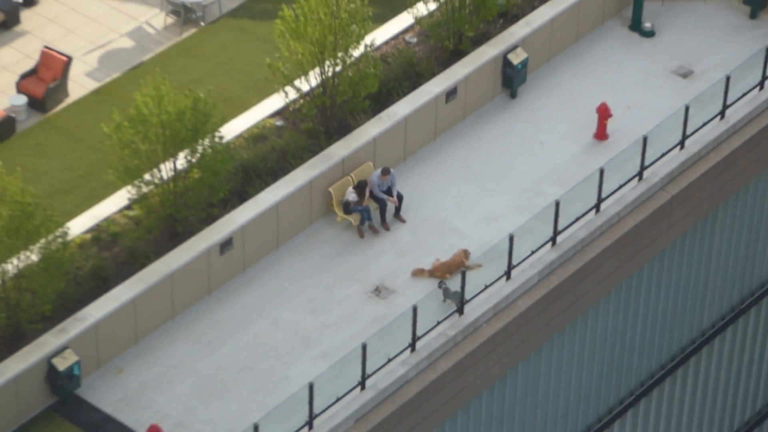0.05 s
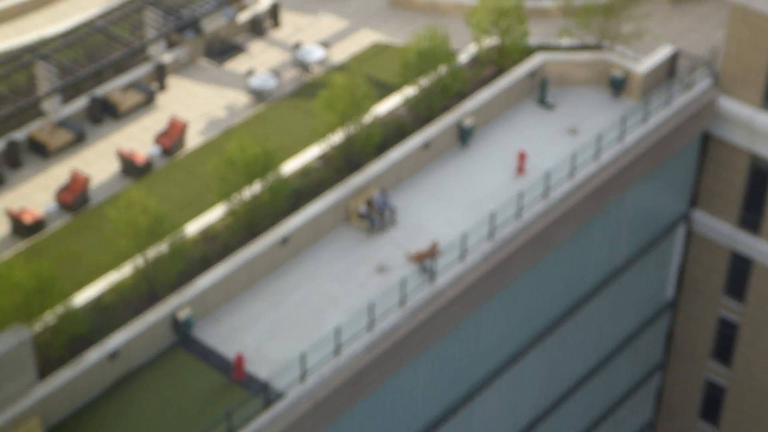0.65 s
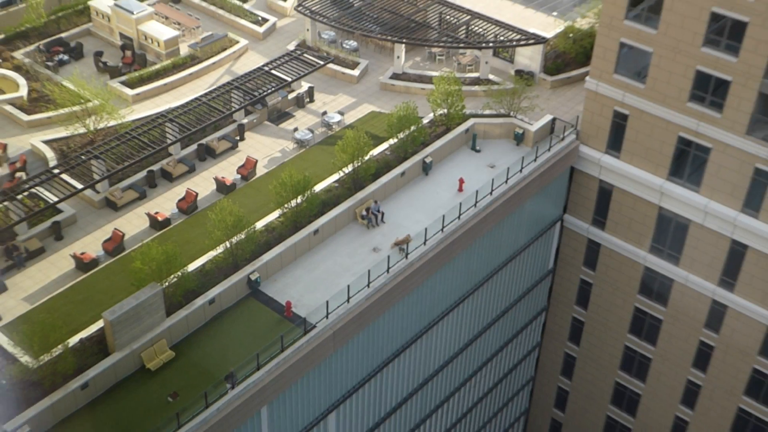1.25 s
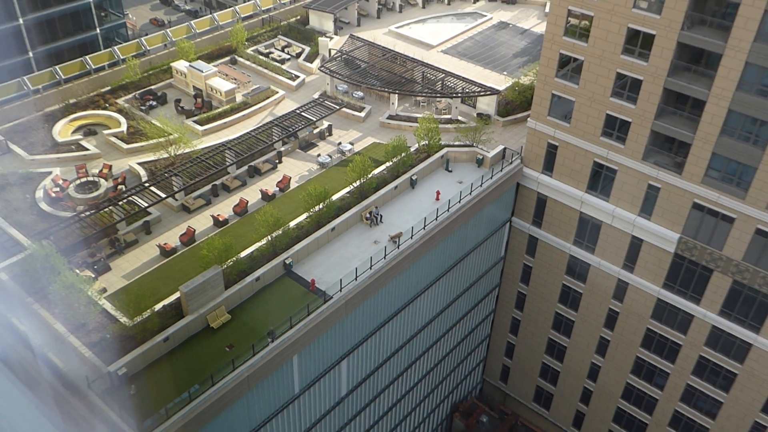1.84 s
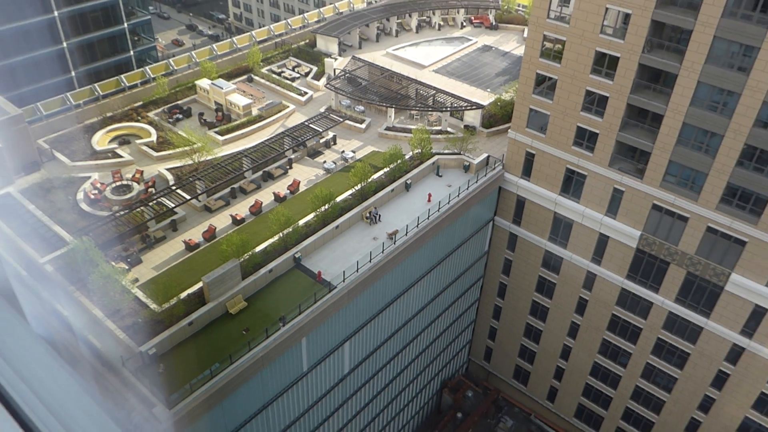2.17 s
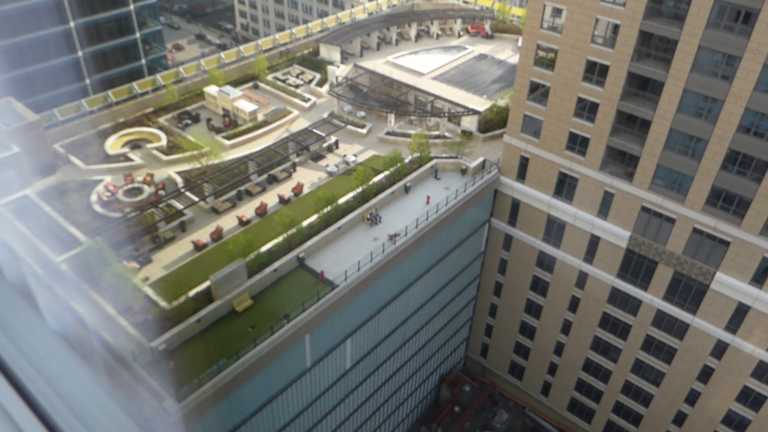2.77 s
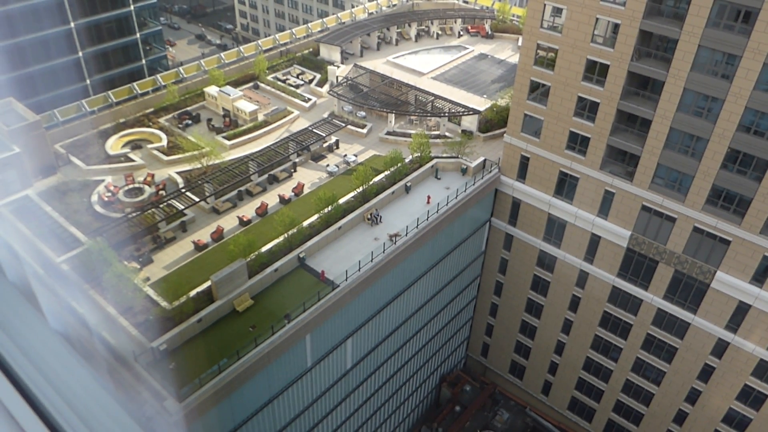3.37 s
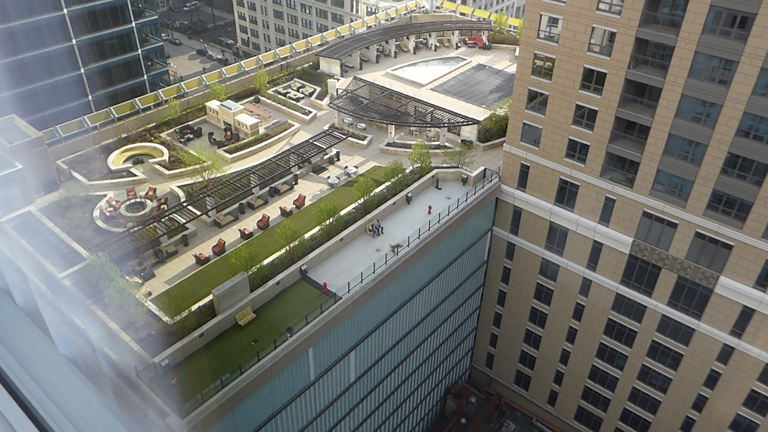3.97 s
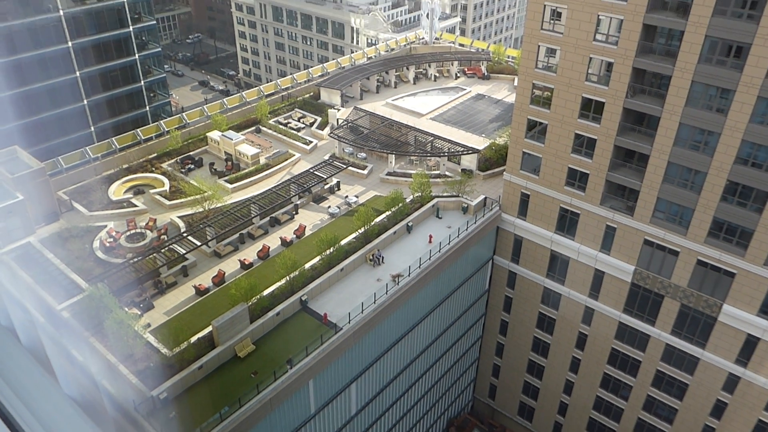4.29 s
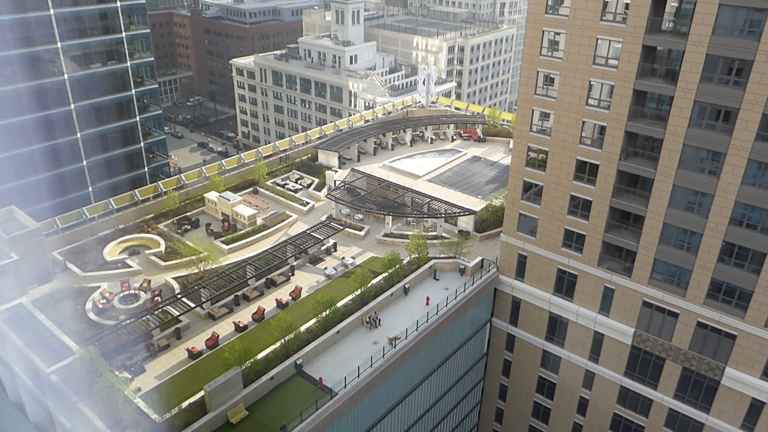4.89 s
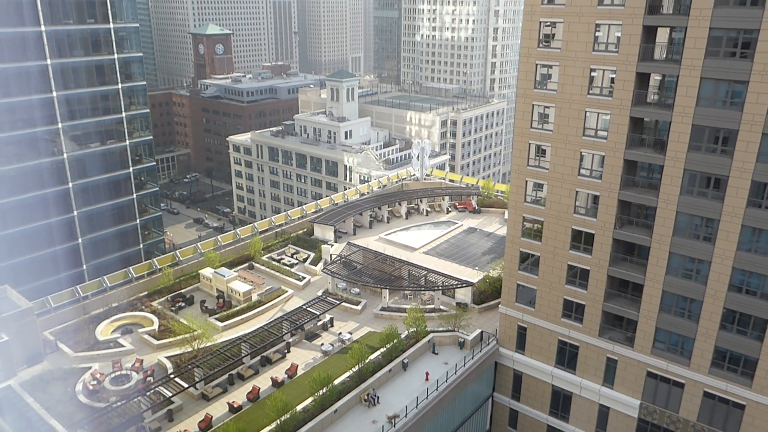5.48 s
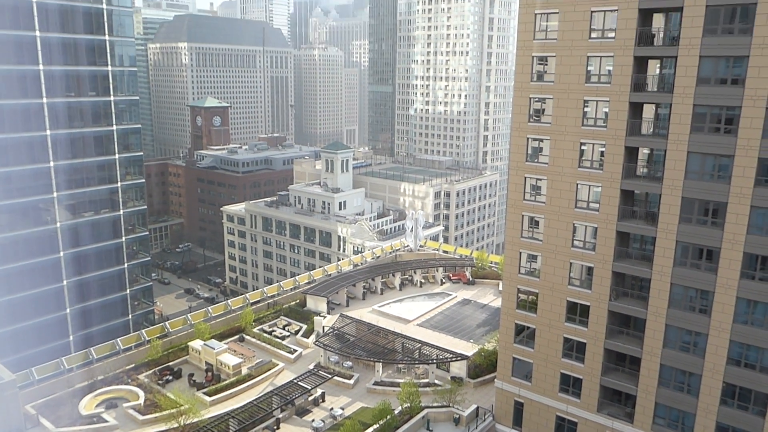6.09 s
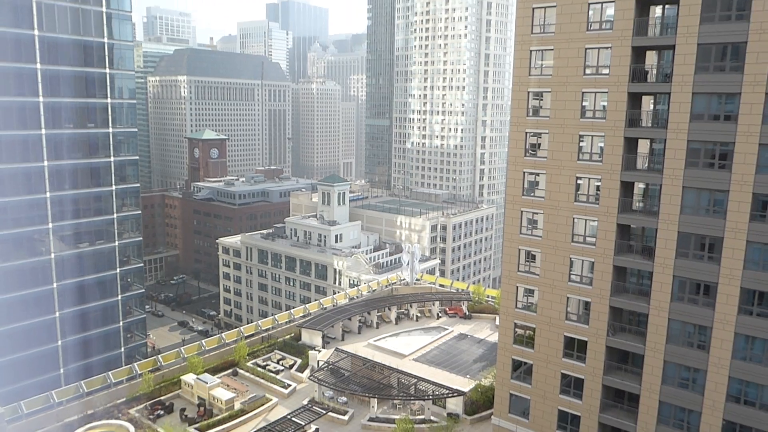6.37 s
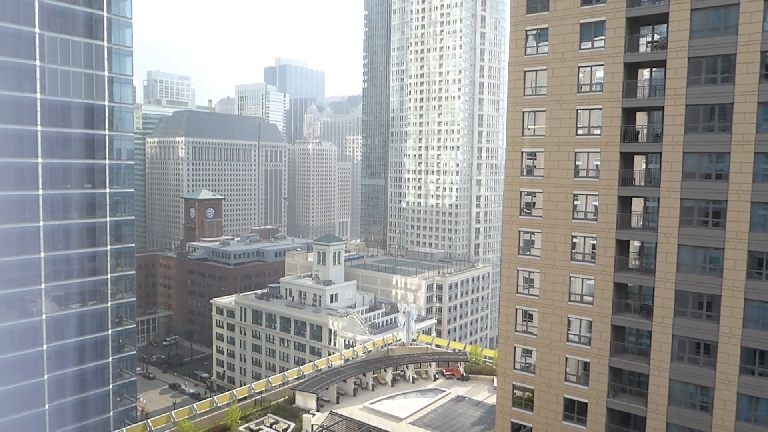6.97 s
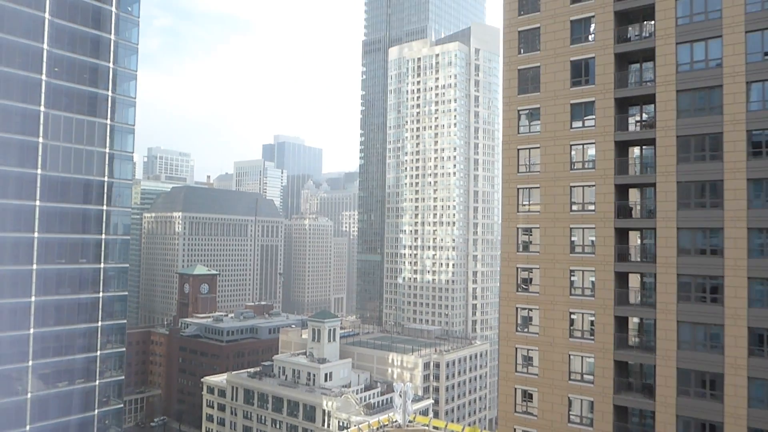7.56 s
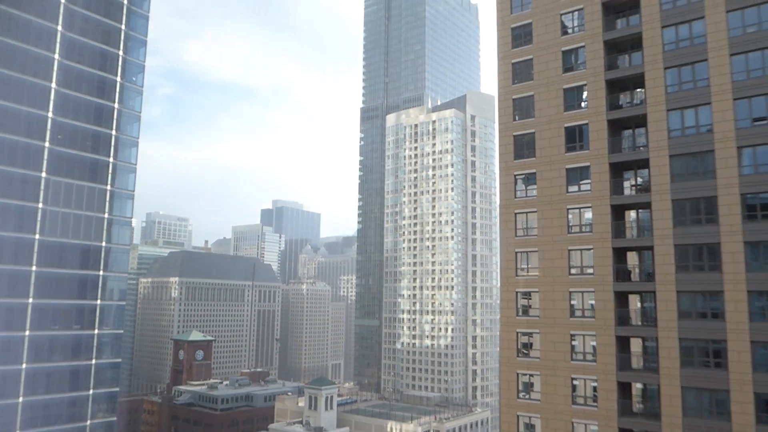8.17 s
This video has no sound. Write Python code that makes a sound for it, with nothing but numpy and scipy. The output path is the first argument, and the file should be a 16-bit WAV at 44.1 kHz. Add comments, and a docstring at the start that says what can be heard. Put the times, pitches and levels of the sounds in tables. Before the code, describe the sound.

Indoor ventilation drones while a camera lens softly whirs and ticks, stops, and the casing snaps once, sharp and close.

```python
"""Camera zoom in a high room

Ventilation hums and throbs under a thin hiss; the city is a dull wash behind the window glass.
Close up, a hand-held camera whirs as its lens zooms out: gears rub and ring the barrel, and the
mechanism ticks. The drive stops, then the casing strains and snaps home with one sharp click,
which makes the camera's gain control duck the room for a moment."""
import sys
import numpy as np
from scipy import signal
from scipy.fft import rfft, irfft, next_fast_len
from scipy.io import wavfile
from scipy.ndimage import uniform_filter1d, map_coordinates

SR = 44100
rng = np.random.default_rng(int(sys.argv[2]) if len(sys.argv) > 2 else 0)


def master_out(mix):
    """Clip the mix to full scale and print it as 16-bit PCM to the path in sys.argv[1]."""
    frames = np.transpose(np.atleast_2d(mix))
    ceiling = np.clip(frames, -1, 1)
    pcm = np.round(ceiling * 32767).astype(np.int16)
    wavfile.write(sys.argv[1], SR, pcm)


N = 363109

# stereo width of diffuse sound: (frequency [Hz], side minus mid [dB])
STEREO_WIDTH = [(25, -5.5), (60, -18.5), (100, -29), (190, -46), (260, -39), (310, -27), (400, -23),
                (500, -14.5), (700, -9.5), (900, -1.5), (1400, 0), (2500, -1.5), (6000, -4), (15000, -4)]
# motor hum and the fan tones that beat against it: (frequency [Hz], level [dB], phase wander [rad])
HUM_TONES = [(239.75, -38.5, 0.089), (248, -46.5, 0.45), (251.6, -53.5, 0.3), (257.4, -51, 0.45),
             (481, -66, 0.3), (703, -69.5, 0.67)]
# slow swelling of the hum: (time [s], gain [dB])
HUM_RIDE = [(0, 0), (1, .5), (2.6, 0), (3.2, 1.5), (4.7, 1), (5.9, -1.5), (7.2, 0), (8.2, -0.4)]
# air rumbling in the ducts: (frequency [Hz], relative level [dB])
DUCT_SPECTRUM = [(20, -24), (50, -41), (70, -27), (98, -13), (120, -13.5), (138, -17), (156, -4.5),
                 (170, -7), (186, -0.5), (208, -3.5), (232, -4), (248, -3.5), (268, -3.5), (280, -8),
                 (302, -12), (322, -8.5), (352, -16), (385, -6), (412, -8), (436, -16.5), (455, -14),
                 (472, -23), (700, -28.5), (1300, -69)]
# traffic through the glass: (frequency [Hz], relative level [dB])
TRAFFIC_SPECTRUM = [(250, -19), (450, -4.5), (570, 1), (720, -2.5), (900, -7.5), (1230, -9), (1400, -19),
                    (2300, -18.5), (2800, -56.5), (6000, -43)]
# waves of traffic passing far below: (time [s], half length [s], level [dB])
TRAFFIC_WAVES = [(1.453, 0.74, -58), (3.251, .35, -57), (4.745, 1, -54)]
# faint drones in the street: (time [s], half length [s], pitch [Hz], level [dB])
STREET_DRONES = [(3.2, 0.29, 571.7, -52), (4.5, 0.66, 579, -59), (4.5, 0.92, 707.4, -55.5),
                 (5.6, 0.56, 709, -55)]
# faint distant squeaks: (time [s], half length [s], pitch [Hz], level [dB])
FAR_SQUEAKS = [(2.91, .05, 2140, -63), (4.86, .06, 5300, -68), (5.1, 0.09, 4530, -67)]
# fine even hiss: (frequency [Hz], relative level [dB])
HISS_SPECTRUM = [(300, -21), (1500, 6.5), (2300, 3.5), (3000, 3.5), (4400, 1), (4750, 0.5), (5300, 0.5),
                 (5720, -8), (6200, 0), (8200, -4), (10000, 1), (11300, -4.5), (12800, -13), (15300, -23.5)]
# resonances of the lens barrel:
# (frequency [Hz], width [Hz], gain extended [dB], gain retracted [dB], side minus mid [dB])
BARREL_MODES = [(1774, 70, 4, 8, -2), (2360, 340, 0, 2.5, -3), (2610, 160, 6, -6, -9),
                (3004, 110, 0, 7, -6), (3210, 130, 10, 1, -10), (3320, 110, -6, 0, -10),
                (3970, 240, 2.5, 2.5, 3.5), (4270, 100, -4, -15, -7), (4500, 57, -4, -13, -5),
                (5350, 150, -11, 1, -2), (5730, 120, -16, -1, -5), (6100, 140, 0, 2, -15),
                (7300, 810, -19, -17, -5), (8750, 470, -10, -8, -6.5)]
# two bright rings of each motor step, sinking as the barrel draws in:
# (pitch extended [Hz], pitch retracted [Hz], width [Hz], gain [dB], rasp against tick [dB])
STEP_RINGS = [(10250, 9800, 1100, 0, 6), (11780, 11500, 860, 0, -2)]
# modes of the lens mount: (frequency [Hz], gain [dB], decay [share of the click's t60])
MOUNT_MODES = [(2260, -6, 0.42), (3330, 1, 0.65), (5720, 0.5, 0.64), (6550, -2.5, 0.65), (7230, -6, 0.5)]
# ping of the lens mount: (frequency [Hz], gain [dB], decay [share of the click's t60])
MOUNT_PING_MODES = [(4080, -1.5, 1.6)]
# low modes of the hollow casing: (frequency [Hz], gain [dB], decay [share of the click's t60])
SHELL_MODES = [(699, -27, 1.6), (975, -23, 2.2), (1940, -5, 0.8), (2825, 3.5, 0.55), (2910, -33, 13),
               (3108, -4, 0.896), (3420, 3, 0.69)]
# modes of the casing's stiff frame: (frequency [Hz], gain [dB], decay [share of the click's t60])
FRAME_MODES = [(3926, 2, 1), (5030, -1, 0.8), (6670, -5.5, 0.58), (7250, -2, 0.58)]
# modes of small stiff catches: (frequency [x their pitch], gain [dB], decay [share of the click's t60])
CATCH_MODES = [(.68, -14.5, 0.56), (.945, -3, 0.5), (1.0, -3.5, 0.58), (1.035, -2, 0.5), (1.19, -17, .4),
               (1.36, -23, 0.33)]
# noisy crack of a plastic contact: (frequency [Hz], relative level [dB])
CRACK_SPECTRUM = [(90, -44), (220, -11.5), (900, -9.5), (1700, -1), (3200, -1.5), (7000, -5), (11000, -6.5),
                  (13000, -14), (15000, -19.5), (16000, -35.5)]
# ticks of the lens mechanism, each with its own mix: # (time [s], gain [dB], mount [dB], mount ping [dB], crack
# [dB], catch [dB], catch pitch [Hz])
LENS_TICKS = [(0.55, -48, -9, -8, -1, 9, 9000), (1.1621, -26.5, -3, 1, -2.5, 14.5, 9880),
              (1.412, -45, -14, -8, -3, 16, 9800), (1.819, -17, 4, -15, -4.5, 7.5, 11040),
              (1.8367, -45, -6, -8, 0, 14, 10200), (1.996, -42, -5, -6, 0, 4, 9400),
              (2.084, -42.5, -2, -6, -1, -8, 10100), (2.788, -46, -2, -6, -5, -10, 10000)]
# contacts of the casing as it strains and snaps home: (time [s], gain [dB], shell [dB], frame [dB],
# crack [dB], catch [dB], rise [s], t60 [s], left minus right [dB])
CASING_SNAPS = [(3.558, -24.5, -13, -1, -3.5, 5, .0005, 0.011, 5.5),
                (3.5861, -14, 1.5, 0.5, -8, -3, 0.00086, 0.012, 2.5),
                (3.5901, -15, -1, -4.5, -4, -1, 0.000908, .023, -2),
                (3.601, -8, -4.5, 1.5, -4.5, -4.5, .0001, 0.012, -6.5),
                (3.6042, -3.5, -9.5, 1.5, -5.5, 5.5, .0001, 0.0091, -1.5),
                (3.6045, 1, 5, 2, -4, 3.5, 0.00011, .012, 1)]


def amp(db):
    """Decibels to gain."""
    return 10 ** (np.asarray(db) / 20)


def unit(x):
    """Scale to rms 1."""
    return x / np.sqrt(np.mean(x ** 2) + 1e-20)


def gain_at(spectrum, hz):
    """Gain of a (frequency [Hz], level [dB]) curve, drawn on a log frequency axis."""
    knots_hz, db = np.transpose(spectrum)
    return amp(np.interp(np.log(hz + 1), np.log(knots_hz + 1), db))


def wobble(rate):
    """A smooth random curve, rate knots a second."""
    return map_coordinates(rng.standard_normal(int(N * rate / SR) + 4), [np.arange(N) * rate / SR])


def swell(at_s, half_s):
    """A soft rise and fall around a moment."""
    return np.exp(-((np.arange(N) / SR - at_s) / half_s) ** 2)


def ease(at_s, width_s):
    """A smooth fade from 0 to 1 around a moment."""
    return .5 + .5 * np.tanh((np.arange(N) / SR - at_s) / (2 * width_s))


def filtered(x, response):
    """EQ x with a response given as a function of frequency."""
    size = next_fast_len(N + SR // 2)
    return irfft(rfft(x, size) * response(np.fft.rfftfreq(size, 1 / SR)), size)[..., :N]


def band(centre_hz, width_hz):
    """Response of a resonance with steep skirts."""
    return lambda hz: np.exp(-2 * ((hz - centre_hz) / width_hz) ** 2)


def stereo(mid, side):
    """Mid and side to left and right."""
    return np.array([mid + side, mid - side])


def panned(x, left_db):
    """Lean a sound to the left by a level difference."""
    return x * amp([[left_db / 2], [-left_db / 2]])


def diffuse_noise():
    """White noise at two close microphones: alike in the bass, wider above."""
    def mid_and_side(hz):
        side = gain_at(STEREO_WIDTH, hz)
        return np.array([np.ones_like(hz), side]) / np.hypot(1, side)
    return stereo(*filtered(rng.standard_normal((2, N)), mid_and_side))


def noise_bed(spectrum):
    """Diffuse noise coloured by a spectrum."""
    return filtered(diffuse_noise(), lambda hz: gain_at(spectrum, hz))


def turbulent(x, depth_db):
    """Turbulence: the level drifts a little, differently at each frequency."""
    bands = signal.stft(x, nperseg=1024)[2]
    drift = uniform_filter1d(rng.standard_normal(bands.shape[1:]), size=3, axis=0)
    drift = uniform_filter1d(drift, size=24, axis=1)
    return signal.istft(bands * amp(depth_db * unit(drift)), nperseg=1024)[1][:, :N]


def wavering_tone(hz, waver, rate):
    """A sine whose pitch strays at random by the share waver."""
    return np.sin(2 * np.pi * np.cumsum(hz * (1 + waver * wobble(rate))) / SR)


def passing_tones(rows, waver, rate):
    """Unsteady tones, each swelling and fading once."""
    return sum(amp(db) * swell(at_s, half_s) * wavering_tone(hz, waver, rate)
               for at_s, half_s, hz, db in rows)


def ventilation(rumble_db=-39.0, surge_db=1.03, throb_db=1.15):
    """A near-steady motor tone and unsteady fan tones throb over the duct rumble."""
    t = np.arange(N) / SR
    hum = 0
    for hz, db, wander in HUM_TONES:
        phase = 2 * np.pi * (hz * t + rng.random()) + wander * wobble(2.44)
        hum += amp(db) * np.sqrt(2) * np.sin(phase)
    ride_db = np.interp(t, *np.transpose(HUM_RIDE)) + throb_db * wobble(14)
    rumble = amp(rumble_db + surge_db * wobble(4)) * unit(noise_bed(DUCT_SPECTRUM))
    return amp(ride_db) * hum + rumble


def traffic(steady_db=-53.5, flutter_db=0.6):
    """Waves of traffic swell over a steady wash; the window takes away the treble."""
    wash = unit(turbulent(noise_bed(TRAFFIC_SPECTRUM), depth_db=1.5))
    wave_power = sum(amp(db) ** 2 * swell(at_s, half_s) for at_s, half_s, db in TRAFFIC_WAVES)
    flow = np.sqrt(amp(steady_db) ** 2 + wave_power)
    return flow * amp(flutter_db * wobble(5.2)) * wash


def nearing_engine(start_s=2.6, level_db=-62, growth_db_per_s=1.2):
    """A low engine drone fades in and grows as it draws nearer."""
    drone = unit(noise_bed([(45, -41.0), (65, -8.5), (90, 6.5), (110, 9.0), (140, -34.0)]))
    growth_db = growth_db_per_s * (np.arange(N) / SR - start_s)
    return ease(start_s, width_s=0.149) * amp(level_db + growth_db) * drone


def swish(level_db=-59.0):
    """A faint soft swish passes, with thin squeaks like far-off brakes."""
    colour = [(1100, -41), (1500, -5), (2050, 7.5), (2500, -12), (4600, -11), (7000, -34.5)]
    rush = unit(turbulent(noise_bed(colour), depth_db=4.5))
    squeaks = passing_tones(FAR_SQUEAKS, waver=0.0116, rate=160)
    return amp(level_db) * swell(at_s=4.98, half_s=0.25) * rush + squeaks


def hiss(level_db=-60.5, dip_db=2.5, swell_db=1.5, whistle_db=-74.5):
    """A thin hiss sinks once, then swells; a trace of airy whistle comes in as the lens stops."""
    air = unit(turbulent(noise_bed(HISS_SPECTRUM), depth_db=1.5))
    ride_db = swell_db * swell(at_s=5.25, half_s=1.1) - dip_db * swell(at_s=2.9, half_s=0.75)
    whistle = unit(filtered(diffuse_noise(), band(centre_hz=4730, width_hz=130)))
    return amp(level_db + ride_db) * air + amp(whistle_db) * ease(at_s=2.46, width_s=.1) * whistle


def lens_travel(soften_db=1, stop_s=2.49, stop_db_per_s=900):
    """The drive softens as the barrel slides in, then cuts out: (drive gain, slide progress 0-1)."""
    slide = ease(at_s=1.47, width_s=.12)
    since_stop = np.maximum(np.arange(N) / SR - stop_s, 0)
    return amp(-soften_db * slide - stop_db_per_s * since_stop), slide


def barrel_response(hz):
    """The barrel's resonances, indexed by [extended or retracted, mid or side, frequency]."""
    response = 0
    for centre, width, extended_db, retracted_db, side_db in BARREL_MODES:
        mode = 1j * hz * width / (centre ** 2 - hz ** 2 + 1j * hz * width)
        gains = amp(np.add.outer([extended_db, retracted_db], [0, side_db]))
        response += gains[..., None] * mode
    return response


def gear_rub(steps, slide, depth=0.6, retracted_from=0.43, retracted_to=0.82):
    """Gears rub twice a motor step and ring the barrel, whose colour shifts as it draws in."""
    rub = rng.standard_normal((2, N)) * (1 + depth * np.cos(2 * np.pi * 2 * steps))
    extended, retracted = filtered(rub, barrel_response)
    blend = retracted_from + (retracted_to - retracted_from) * slide
    return unit(stereo(*((1 - blend) * extended + blend * retracted)))


def motor_steps(steps, slide, jitter=.03, scatter_db=1.5, side_db=-9):
    """Each motor step is a tiny bright tick over a fine rasp."""
    pulses = np.diff(np.floor(steps + jitter * wobble(100)), prepend=0) > 0
    jolts = unit(pulses * amp(scatter_db * wobble(100)))
    rasp = stereo(rng.standard_normal(N), amp(side_db) * rng.standard_normal(N))
    ticks = 0
    for extended_hz, retracted_hz, width, db, rasp_db in STEP_RINGS:
        push = amp(db) * unit(jolts + amp(rasp_db) * rasp)
        ticks += (1 - slide) * filtered(push, band(extended_hz, width))
        ticks += slide * filtered(push, band(retracted_hz, width))
    return unit(ticks)


def gear_whine(extended_hz=2985, extended_db=-67.0, retracted_hz=3990, retracted_db=-70):
    """A thin unsteady whine crossfades to a higher resonance as the lens draws in."""
    drive, slide = lens_travel()
    tone = lambda hz: np.sqrt(2) * wavering_tone(hz, waver=0.01104, rate=200)
    low = amp(extended_db) * tone(extended_hz)
    high = amp(retracted_db) * tone(retracted_hz)
    return drive * ((1 - slide) * low + slide * high)


def zoom_motor(level_db=-58.5, step_hz=109, drift=.003, ticks_db=-4):
    """The whir of the zoom: gear rub and step ticks locked to one slightly drifting motor."""
    drive, slide = lens_travel()
    steps = np.cumsum(step_hz * (1 + drift * wobble(3.5))) / SR
    gears = panned(gear_rub(steps, slide), left_db=1.5)
    return amp(level_db) * drive * (gears + amp(ticks_db) * motor_steps(steps, slide))


def ring(modes, t, t60, pitch=1, lag_rad=0.34):
    """Damped modes of alternating polarity, struck with new strengths each time; the left side lags."""
    phase = np.array([[-lag_rad], [lag_rad]])
    out = 0
    for k, (hz, db, share) in enumerate(modes):
        decay = amp(db + rng.normal(0, 1) - 60 * t / (t60 * share))
        out += (-1) ** k * decay * np.sin(2 * np.pi * hz * pitch * t + phase)
    return out


def shell(t, t60, thump_hz=430, thump_db=-24, thump_t60=0.014, rise_s=0.000288):
    """The hollow casing takes a moment to start ringing, and the jolt thumps the whole camera."""
    thump = amp(thump_db - 60 * t / thump_t60) * np.sin(2 * np.pi * thump_hz * t)
    return (ring(SHELL_MODES, t, t60) + thump) * (1 - np.exp(-t / rise_s))


def contact(body, crack, t, t60, rise_s, body_db=-9.0, crack_db=-4.0):
    """Plastic meets plastic: a dying crack of noise on top of the ringing body."""
    mix = amp(body_db) * body + amp(crack_db - 60 * t / t60) * crack
    return mix * (1 - np.exp(-t / rise_s))


def lens_ticks(t, crack_noise, t60=0.014, shell_db=-12):
    """Hard little contacts in the lens ring its mount, the mount's ping, a catch and, faintly, the casing."""
    out = np.zeros((2, N))
    for at_s, db, mount_db, ping_db, crack_db, catch_db, catch_hz in LENS_TICKS:
        span = round(at_s * SR) + np.arange(len(t))
        body = amp(mount_db) * (ring(MOUNT_MODES, t, t60) + amp(shell_db) * shell(t, t60))
        body += amp(ping_db) * ring(MOUNT_PING_MODES, t, t60)
        body += amp(catch_db) * ring(CATCH_MODES, t, t60, catch_hz)
        tick = contact(body, amp(crack_db) * crack_noise[:, span], t, t60, rise_s=.0001)
        out[:, span] += panned(amp(db) * tick, left_db=-2)
    return out


def casing_click(t, crack_noise, catch_hz=9460):
    """The casing strains and snaps home: a tight cluster of contacts rings shell, frame and catch."""
    out = np.zeros((2, N))
    for at_s, db, shell_db, frame_db, crack_db, catch_db, rise_s, t60, left_db in CASING_SNAPS:
        span = round(at_s * SR) + np.arange(len(t))
        body = amp(shell_db) * shell(t, t60)
        body += amp(frame_db) * ring(FRAME_MODES, t, t60)
        body += amp(catch_db) * ring(CATCH_MODES, t, t60, catch_hz)
        snap = contact(body, amp(crack_db) * crack_noise[:, span], t, t60, rise_s)
        out[:, span] += panned(amp(db) * snap, left_db)
    return out


def room_reverb(x, early_db=-15, early_t60=0.09, late_db=-33, late_t60=0.324):
    """The near window answers at once, the furnished room with a short weak tail."""
    t = np.arange(SR // 3) / SR
    tail = lambda t60: unit(rng.standard_normal((2, len(t))) * amp(-60 * t / t60)) / np.sqrt(len(t))
    impulse = amp(early_db) * tail(early_t60) + amp(late_db) * tail(late_t60)
    return signal.fftconvolve(x, impulse, axes=1)[:, :N]


def scene():
    """Room tone and street behind, the camera up front; only its clicks feed the reverb."""
    street = traffic() + nearing_engine() + swish() + passing_tones(STREET_DRONES, waver=0.009, rate=45)
    click_time = np.arange(SR // 8) / SR
    crack_noise = unit(noise_bed(CRACK_SPECTRUM))
    clicks = lens_ticks(click_time, crack_noise) + casing_click(click_time, crack_noise)
    return ventilation() + street + hiss() + zoom_motor() + gear_whine() + clicks + room_reverb(clicks)


def record(dry, threshold_db=-11.0, attack_s=0.011, release_s=0.033,
           low_cut_hz=62, roll_off_hz=15400, top_hz=15800):
    """Gain control ducks just after a loud peak and recovers; peaks clip; deep bass and top are cut."""
    t = np.arange(N) / SR
    peak_db = 20 * np.log10(np.abs(dry).max(axis=0) + 1e-9)
    over_db = np.maximum(peak_db - threshold_db, 1e-9)
    # each overshoot is caught, then let go exponentially
    held_db = np.exp(np.maximum.accumulate(np.log(over_db) + t / release_s) - t / release_s)
    pole = np.exp(-1 / (attack_s * SR))
    duck_db = signal.lfilter([1 - pole], [1, -pole], held_db)
    clipped = np.clip(dry * amp(-duck_db), -1, 1)
    low_cut = lambda hz: hz ** 2 / np.hypot(hz ** 2, low_cut_hz ** 2)
    high_cut = lambda hz: (hz < top_hz) / (1 + (hz / roll_off_hz) ** 40)
    return filtered(clipped, lambda hz: low_cut(hz) * high_cut(hz))


dry = scene()
out = record(dry)
master_out(out)
```